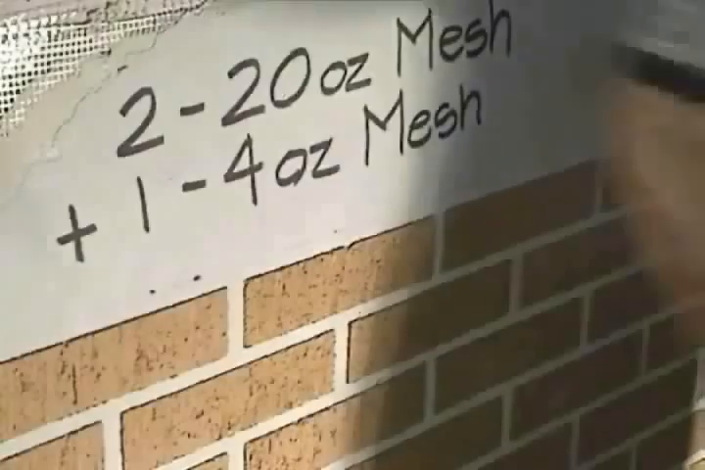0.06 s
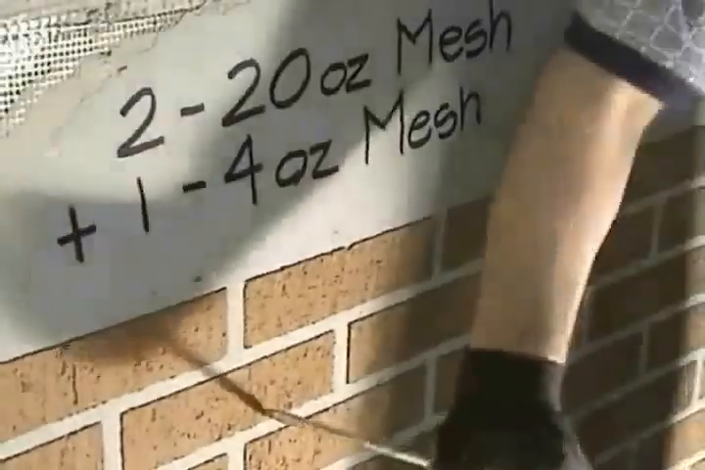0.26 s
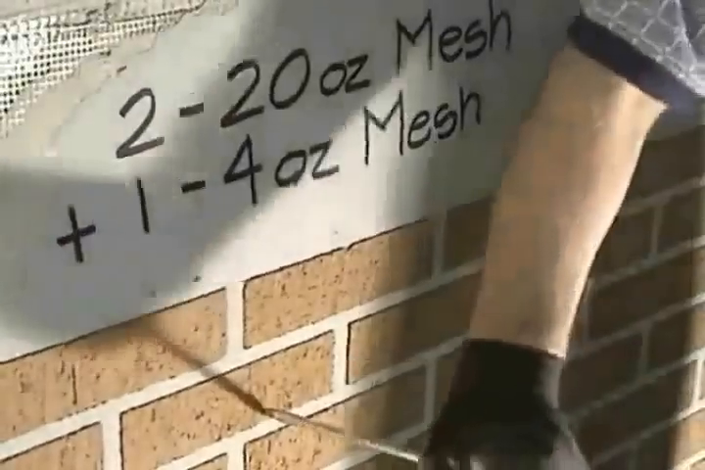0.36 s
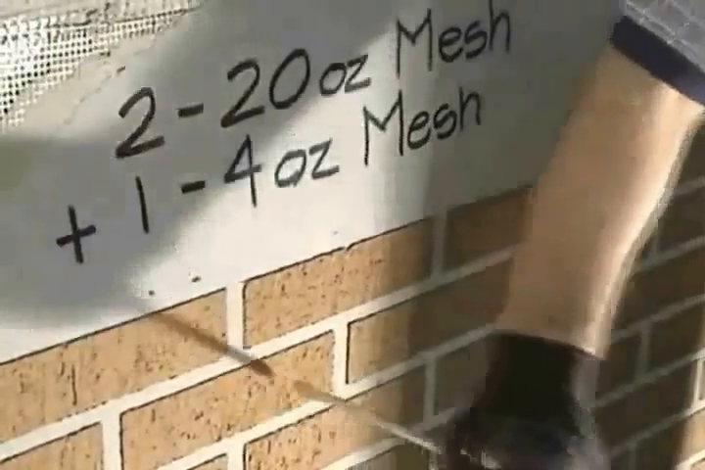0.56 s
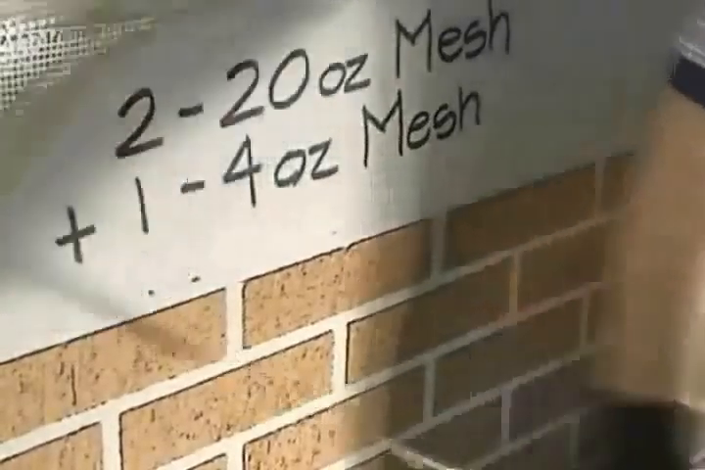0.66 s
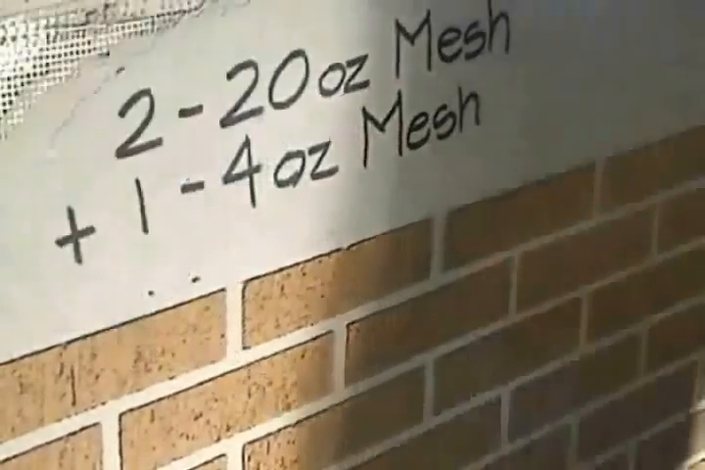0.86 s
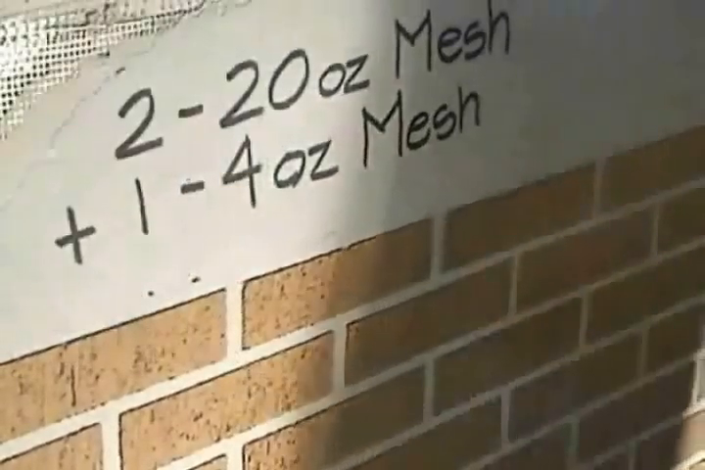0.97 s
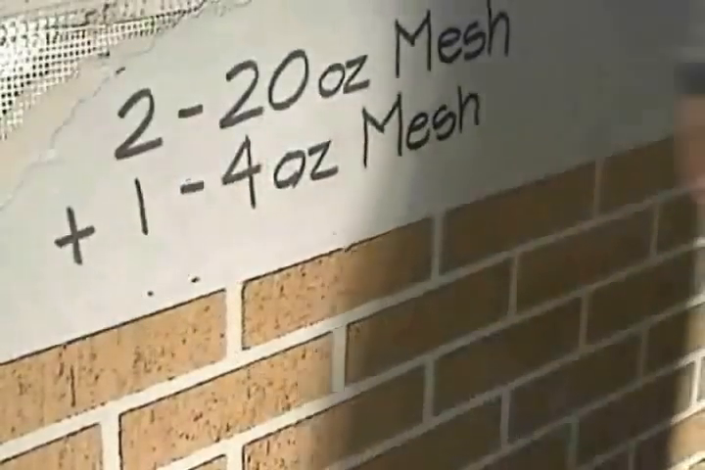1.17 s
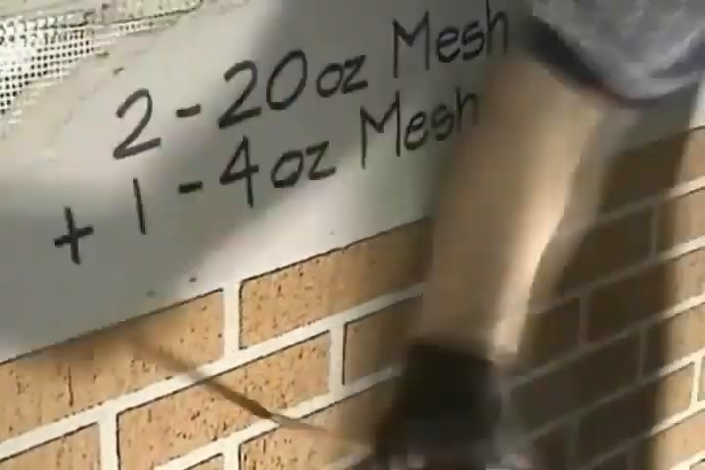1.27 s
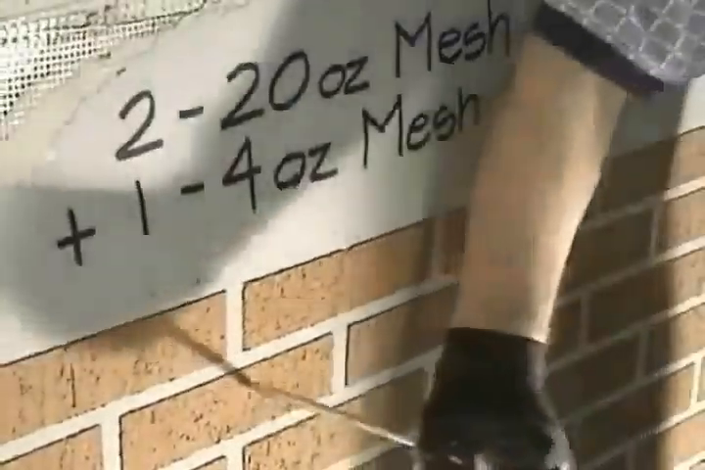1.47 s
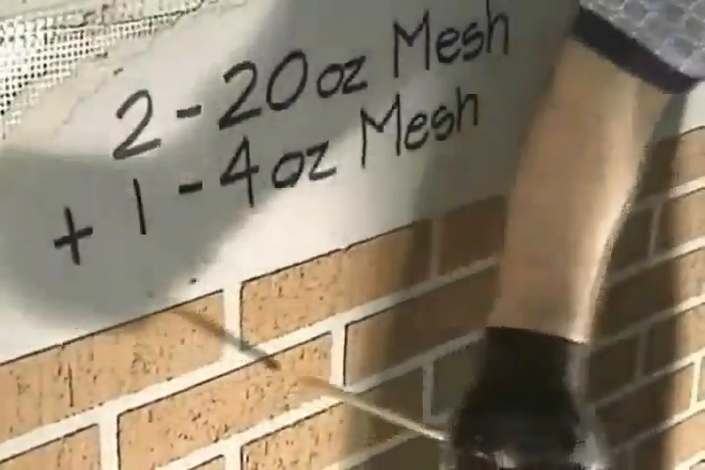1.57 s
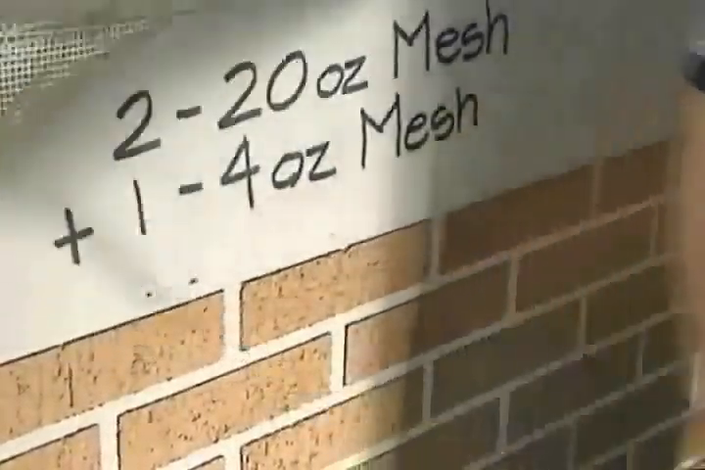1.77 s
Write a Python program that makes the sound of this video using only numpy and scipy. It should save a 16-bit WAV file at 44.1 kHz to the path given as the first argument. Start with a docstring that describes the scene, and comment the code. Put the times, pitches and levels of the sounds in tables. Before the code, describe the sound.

A hammer strikes a hollow wall panel close by at 0.2 seconds, a sharp crack with a boom that fades in about half a second. The head crunches briefly in the dent, and plaster crumbs tick down. A second, slightly softer blow lands at about 1.3 seconds, with more crunching and faint ticks until 1.8 seconds. A quiet machine hum and ventilation rush continue underneath.

```python
"""Two hammer blows on a rendered wall

Close by, a hand-swung hammer strikes a wall panel twice over a bed of humming workshop machines.
Each blow cracks the hard skin and sets the hollow panel booming; the head crunches in the dent and is
pulled free, and crumbs of render tick down. A fast limiter flattens the start of each boom."""
import sys
import numpy as np
from scipy import signal
from scipy.fft import rfft, irfft
from scipy.io import wavfile

SR = 44100
rng = np.random.default_rng(int(sys.argv[2]) if len(sys.argv) > 2 else 0)


def put_to_file(sound):
    """Save the sound as 16-bit audio at rate SR, in the file named by the first command-line argument."""
    columns = np.atleast_2d(sound).T  # one column per channel
    safe = np.clip(columns, -1, 1)
    whole_steps = np.round(safe * 32767)
    wavfile.write(sys.argv[1], SR, whole_steps.astype(np.int16))


N = 79380

# Ventilation rush. Each row: frequency in Hz, relative spectral level in dB.
VENT_COLOUR = [(12, -36), (20, 11.5), (310, -9), (485, -8), (542, -17.5), (590, -10.5), (1480, -17.5),
               (1710, -12), (2140, -19), (2530, -14.5), (4180, -21.5), (6720, -24.5), (16000, -38.5)]
# Machine hum. Each row: pitch in Hz, rms level in dB.
HUM_TONES = [(120, -60), (148, -60), (200, -60.5), (360, -62), (479, -61), (599, -61.5), (1200, -66.5),
             (1572, -64), (1873, -73), (2040, -66), (2471, -68.5), (2622, -61.5), (2923, -69)]
# Workshop reverb. Each row: frequency in Hz, seconds to fade by 60 dB.
ROOM_T60 = [(100, 0.68), (1000, 0.53), (4000, 0.52), (14000, 0.41)]
# Crumbs of render landing. Each row: start in seconds, level in dB, centre of the tick in Hz.
CRUMB_LANDINGS = [(0.126, -18.5, 7120), (0.184, -21, 6900), (0.192, -14.5, 2500), (0.5626, -6.5, 6460),
                  (0.5635, -9, 1680), (0.648, -20, 6000), (0.6544, -4.5, 5100), (0.661, -21, 6040),
                  (0.671, -30, 7000), (0.693, -19.5, 3760), (0.7222, -11.5, 2600), (0.773, -22, 5000),
                  (0.801, -21, 5440), (0.825, -19, 4660), (0.8493, -16, 7300), (0.863, -20.5, 8000),
                  (0.910, -17.5, 5500), (1.077, -27, 8000), (1.217, -22, 6000), (1.2334, -15, 5430),
                  (1.273, -20.5, 7500), (1.656, -21.5, 5000), (1.690, -30, 8000), (1.709, -32, 6000),
                  (1.725, -16.5, 5200), (1.758, -22.5, 6000), (1.797, -24.5, 6000)]
# Tone shared by all crumbs. Each row: frequency in Hz, relative spectral level in dB.
TICK_COLOUR = [(200, -15), (1200, 6), (4500, -2), (5700, 2.5), (7500, -3), (11000, -7.5), (13000, -1),
               (16000, 4.5)]
# The head grinding in the dent. Each row: start and length in seconds, body and grit levels in dB.
GRINDS = [(0.255, 0.027, -11.5, -30), (0.271, 0.0018, -9, -25.5), (0.444, 0.014, -35.5, -48),
          (0.480, 0.015, -26.5, -33), (0.498, 0.015, -24, -38), (0.548, 0.0033, -26, -37),
          (1.36, .002, -10, -17), (1.401, 0.012, -13, -29.5), (1.423, 0.013, -16.5, -26),
          (1.444, 0.035, -20, -28.5), (1.5498, 0.0058, -25.5, -30.5)]
# The knock of one fracture. Each row: frequency in Hz, relative spectral level in dB.
BODY_COLOUR = [(60, -26.5), (250, -2), (400, -4), (550, 1), (700, -3), (1000, -4), (1270, -5.5),
               (1550, -9.5), (3200, -17), (6000, -34.5), (16000, -63)]
# The snap of one fracture. Each row: frequency in Hz, relative spectral level in dB.
GRIT_COLOUR = [(200, -34), (1500, 9), (3200, 8.5), (7000, -5), (9200, 0.5), (11000, -16), (13500, -1.5),
               (16000, -11)]
# Hammer blows. Each row: start in seconds, level in dB, crack trim in dB, ping level in dB,
# ring length as a factor, treble tilt in dB per octave.
HAMMER_BLOWS = [(0.2003, -3, 2.5, 14, 0.89, 1.74), (1.3431, -5.5, -9, 16, 0.98, 0.83)]
# Panel modes. Each row: pitch in Hz, nominal seconds to fade by 60 dB,
# relative level in dB at the first spot struck, then at the second.
PANEL_MODES = [(90.3, 0.73, -15, -20.5), (108.3, 0.35, -9, -8), (150.2, 0.68, -7.5, -9), (225, 0.54, -4, 0),
               (255, 0.53, -2, -2.5), (284.2, 0.62, -8, -20), (311.5, 0.52, -12, -13.5),
               (377.7, .42, 0, -7.5), (391, 0.34, -29, 2), (413, 0.42, -0.5, -3), (518, 0.33, -11, -12),
               (604.7, 0.25, -4.5, -6.5), (640, 0.28, 0, -3.5), (659, 0.33, -5.5, -2), (830, 0.36, -1, -11),
               (913, 0.31, -10, -4.5), (1052, 0.17, -4, -21), (1138, 0.28, -3.5, -4),
               (1343, 0.17, -27, -19), (1539, 0.32, -16.5, -20), (1840, 0.36, -14, -18.5)]
# Dense ring of panel and wall frame. Each row: frequency in Hz, relative spectral level in dB.
BOOM_COLOUR = [(25, -1), (60, -1), (130, -0.5), (250, 4), (500, -1.5), (900, -2), (1400, -9.5),
               (2000, -14.5), (3200, -21.5), (6000, -31.5), (11000, -49), (16000, -44)]
# Decay of that ring. Each row: frequency in Hz, nominal seconds to fade by 60 dB.
BOOM_DECAY = [(40, 0.71), (150, 0.63), (400, 0.52), (1000, 0.35), (3000, 0.49), (12000, 0.55)]
# Crack of the hard skin. Each row: frequency in Hz, relative spectral level in dB.
CRACK_COLOUR = [(100, -34), (600, -7.5), (1200, 6.5), (2200, 9), (3400, -1), (6000, -13.5), (10000, -10.5),
                (16000, -14.5)]

VENT_DB, HUM_WAVER_RAD, ROOM_DB = -46, 0.25, -12.5
CRUMB_OCTAVES, CRUMB_RING_S, CRUMB_TAIL_GAIN, CRUMB_TAIL_S = 0.92, 0.0013, 0.12, 0.011
DUST_COUNT, DUST_DB, DUST_HZ, DUST_SPREAD_DB, DUST_SCATTER_S = 4, -37, 6860, 4.5, 0.035
GRAINS_PER_S, GRAIN_SPREAD_DB, CRUNCH_RISE_S, CRUNCH_FADE_S = 2500, 4, 0.002, 0.0037
BOOM_DB, BOOM_RISE_S, MODES_DB, CONTACT_S = -0.5, 0.00063, -6.5, 0.0004
BASS_RISE_S, BASS_HZ, TREBLE_RISE_S, TREBLE_HZ = 0.046, 128, 0.018, 2230
CRACK_DB, PING_HZ, PING_S = 17.5, 3080, 0.00022
KNOCK_DB, KNOCK_HZ, KNOCK_S = 4.5, 818, 0.0036  # the struck spot itself, heavily damped
SHATTER_DB, SHATTER_S = -6, 0.0023  # grit bursting from under the head
LIMIT_DB, LIMIT_SLOPE, RECOVER_DB_PER_S, LIMIT_ATTACK_S = -4, 0.53, 96, 0.00021
LOW_CUT_HZ, HIGH_CUT_HZ = 24, 16100


def amp(db):
    """Decibels to gain."""
    return 10 ** (np.asarray(db) / 20)


def unit(x):
    """Scales to rms 1."""
    return x / np.sqrt(np.mean(x ** 2) + 1e-20)


def curve(points, hz):
    """Reads a table on a log-frequency axis."""
    f, value = np.transpose(points)
    return np.interp(np.log(hz + 1), np.log(f + 1), value)


def decay(t, t60):
    """An envelope that falls 60 dB in t60 seconds."""
    return np.exp(-np.log(1000) * t / t60)


def add(mix, start_s, sound):
    """Drops a sound into the mix."""
    part = mix[round(start_s * SR):][:len(sound)]
    part += sound[:len(part)]


def pulse(colour, size=2048):
    """A minimum-phase click of energy 1 with the given spectrum."""
    log_gain = np.log(amp(curve(colour, abs(np.fft.fftfreq(size, 1 / SR)))))
    click = np.fft.ifft(np.exp(np.conj(signal.hilbert(log_gain)))).real
    return click / np.linalg.norm(click)


def noise(gain_at, size):
    """Noise of rms 1 whose spectrum follows a function of frequency."""
    hz = np.fft.rfftfreq(size, 1 / SR)
    return unit(irfft(np.exp(2j * np.pi * rng.random(len(hz))) * gain_at(hz), size))


def bands(x, count=14):
    """Splits a sound into overlapping bands, yielding each centre in Hz with its band."""
    centres = np.geomspace(30, 16000, count)
    hz, spectrum = np.fft.rfftfreq(len(x), 1 / SR), rfft(x)
    for centre, weights in zip(centres, np.eye(count)):
        yield centre, irfft(spectrum * curve(np.c_[centres, weights], hz), len(x))


def machines():
    """The bed: a steady ventilation rush under wavering hum tones."""
    t = np.arange(N) / SR
    bed = amp(VENT_DB) * noise(lambda hz: amp(curve(VENT_COLOUR, hz)), N)
    for hz, db in HUM_TONES:
        waver = HUM_WAVER_RAD * noise(lambda f: 1 / (1 + (f / 5) ** 2), N)
        bed += amp(db) * np.sqrt(2) * np.sin(2 * np.pi * (hz * t + rng.random()) + waver)
    return bed


def room_reverb(send):
    """The workshop's diffuse tail, the treble dying first."""
    t = np.arange(SR) / SR
    tail = sum(band * decay(t, curve(ROOM_T60, hz)) for hz, band in bands(rng.standard_normal(SR)))
    return signal.fftconvolve(send, tail / np.linalg.norm(tail))[:N]


def crumb(level_db, centre_hz, size=2048):
    """A chip of render lands with a short, bright tick and a faint tail."""
    def colour(hz):
        octaves_off = np.log2((hz + 1) / centre_hz)
        return amp(curve(TICK_COLOUR, hz)) / (1 + (octaves_off / CRUMB_OCTAVES) ** 2)

    t = np.arange(size) / SR
    envelope = np.exp(-t / CRUMB_RING_S) + CRUMB_TAIL_GAIN * np.exp(-t / CRUMB_TAIL_S)
    tick = noise(colour, size) * envelope
    return amp(level_db) * tick / np.linalg.norm(tick)


def debris():
    """The larger crumbs fall, each in a little sprinkle of dust."""
    out = np.zeros(N)
    for start_s, level_db, hz in CRUMB_LANDINGS:
        add(out, start_s, crumb(level_db, hz))
        for timing, size, pitch in rng.random((DUST_COUNT, 3)):
            speck_db = DUST_DB + DUST_SPREAD_DB * min(-np.log(size), 2)
            speck_s = max(start_s + DUST_SCATTER_S * (2 * timing - 1), 0)
            add(out, speck_s, crumb(speck_db, DUST_HZ * 2 ** (pitch - 0.5)))
    return out


def crunch(length_s, body_db, grit_db):
    """The head grinds out a burst of tiny fractures: each snaps in the skin and knocks the panel."""
    t = np.arange(SR // 8) / SR
    envelope = np.minimum(t / CRUNCH_RISE_S, 1) * np.exp(-np.maximum(t - length_s, 0) / CRUNCH_FADE_S)
    sizes = amp(GRAIN_SPREAD_DB * np.minimum(rng.exponential(1, len(t)), 3))
    polarity = rng.choice([-1, 1], len(t))
    triggers = rng.random(len(t)) < GRAINS_PER_S / SR
    fracture = amp(body_db) * pulse(BODY_COLOUR) + amp(grit_db) * pulse(GRIT_COLOUR)
    return signal.fftconvolve(envelope * unit(sizes * polarity * triggers), fracture)


def panel_boom(t, ring_scale, tilt_db):
    """Panel and frame ring densely; the mids speak first, the bass and the fizz bloom later."""
    ring = noise(lambda hz: amp(curve(BOOM_COLOUR, hz) + tilt_db * np.log2(hz / 500 + 1)), len(t))
    boom = 0
    for hz, band in bands(ring):
        bass_lag = BASS_RISE_S / (1 + (hz / BASS_HZ) ** 2)
        treble_lag = TREBLE_RISE_S / (1 + (TREBLE_HZ / hz) ** 2)
        attack = 1 - np.exp(-t / (BOOM_RISE_S + bass_lag + treble_lag))
        boom += band * attack * decay(t, ring_scale * curve(BOOM_DECAY, hz))
    return amp(BOOM_DB) * boom


def panel_tones(t, spot, ring_scale):
    """The hollow panel's modes ring out, their balance set by the spot struck."""
    tones = 0
    for hz, t60, *spot_db in PANEL_MODES:
        envelope = amp(spot_db[spot]) * decay(t, ring_scale * t60)
        tones += envelope * np.sin(2 * np.pi * (hz * t + rng.random()))
    return amp(MODES_DB) * tones * (1 - np.exp(-t / CONTACT_S))


def hammer_blow(spot, level_db, crack_db, ping_db, ring_scale, tilt_db):
    """The head hits the skin: crack, ping, knock and grit make the attack, the panel the body."""
    t = np.arange(SR) / SR
    body = panel_boom(t, ring_scale, tilt_db) + panel_tones(t, spot, ring_scale)
    ping = -amp(ping_db) * np.exp(-t / PING_S) * np.sin(2 * np.pi * PING_HZ * t)
    knock = amp(KNOCK_DB) * np.exp(-t / KNOCK_S) * np.sin(2 * np.pi * KNOCK_HZ * t)
    grit = noise(lambda hz: amp(curve(GRIT_COLOUR, hz)), SR)
    shatter = amp(SHATTER_DB) * np.exp(-t / SHATTER_S) * grit
    hit = body + ping + knock + shatter
    add(hit, 0, amp(CRACK_DB + crack_db) * pulse(CRACK_COLOUR))
    return amp(level_db) * hit


def scene():
    """The mono mix: machine bed, blows and rubble; only crunches and debris feed the reverb."""
    bed, blows, rubble = machines(), np.zeros(N), np.zeros(N)
    for spot, (start_s, *settings) in enumerate(HAMMER_BLOWS):
        add(blows, start_s, hammer_blow(spot, *settings))
    for start_s, *settings in GRINDS:
        add(rubble, start_s, crunch(*settings))
    rubble += debris()
    return (bed + blows + rubble + amp(ROOM_DB) * room_reverb(rubble))[None]


def record(dry):
    """Low cut, a fast limiter that lets the first crack clip but holds the boom down, then high cut."""
    dry = signal.sosfilt(signal.butter(2, LOW_CUT_HZ, "highpass", fs=SR, output="sos"), dry)
    level_db = 20 * np.log10(abs(dry[0]) + 1e-9)
    release_db = np.arange(N) / SR * RECOVER_DB_PER_S
    peak_db = np.maximum.accumulate(level_db + release_db) - release_db  # jumps up, sinks steadily
    over_db = np.maximum(peak_db - LIMIT_DB, 0)
    attack_pole = np.exp(-1 / (LIMIT_ATTACK_S * SR))
    cut_db = signal.lfilter([1 - attack_pole], [1, -attack_pole], LIMIT_SLOPE * over_db)
    limited = np.clip(dry * amp(-cut_db), -1, 1)
    high_cut = signal.firwin(301, HIGH_CUT_HZ, window=("kaiser", 8), fs=SR)
    return signal.oaconvolve(limited, high_cut[None], "same")


dry = scene()
out = record(dry)
put_to_file(out)
```